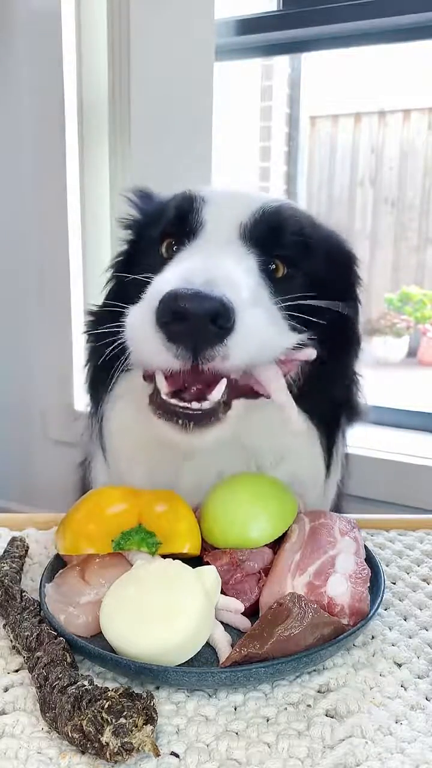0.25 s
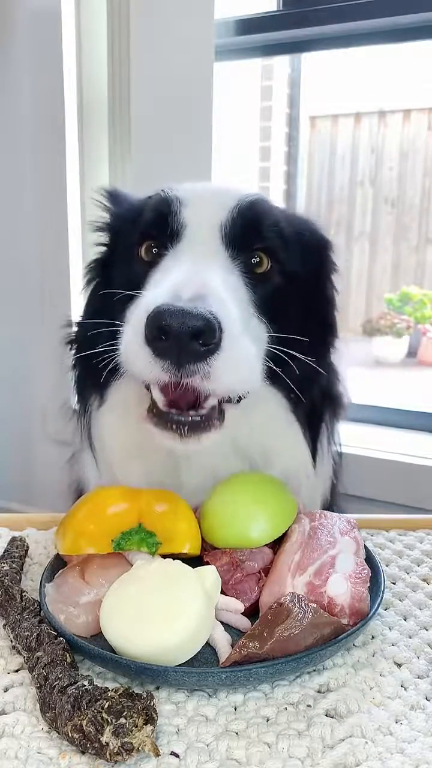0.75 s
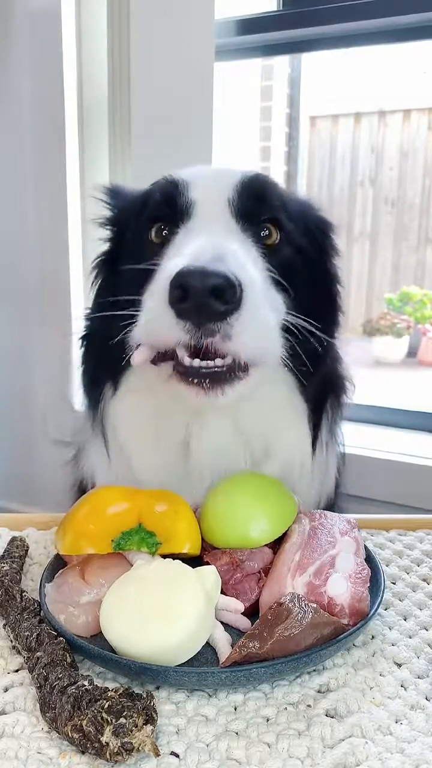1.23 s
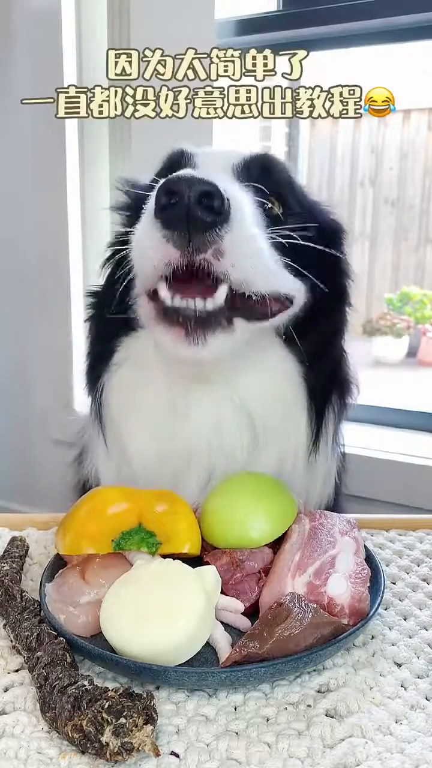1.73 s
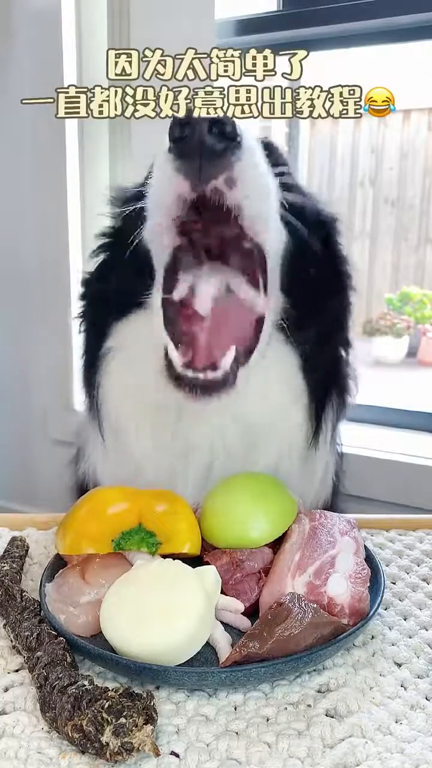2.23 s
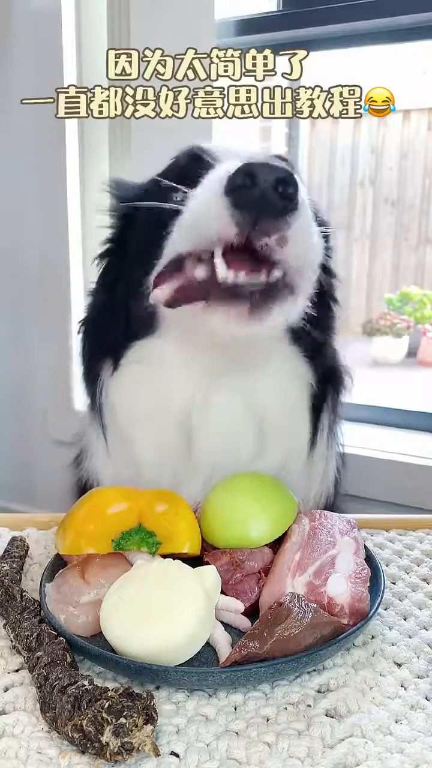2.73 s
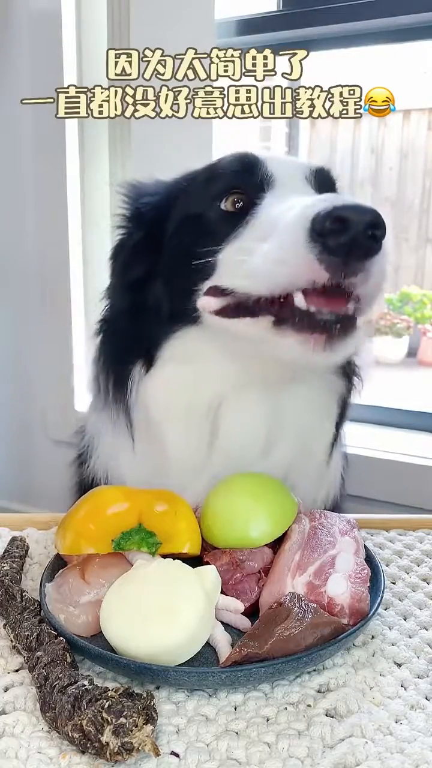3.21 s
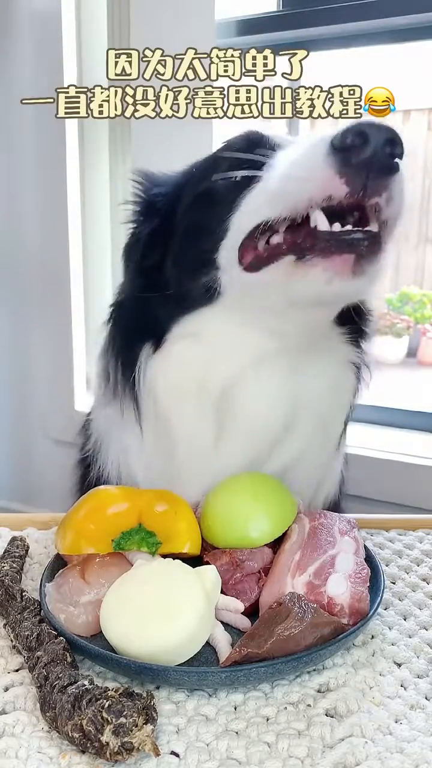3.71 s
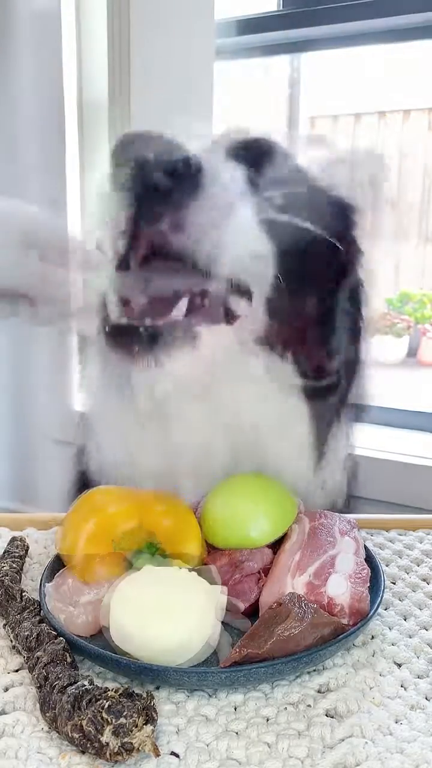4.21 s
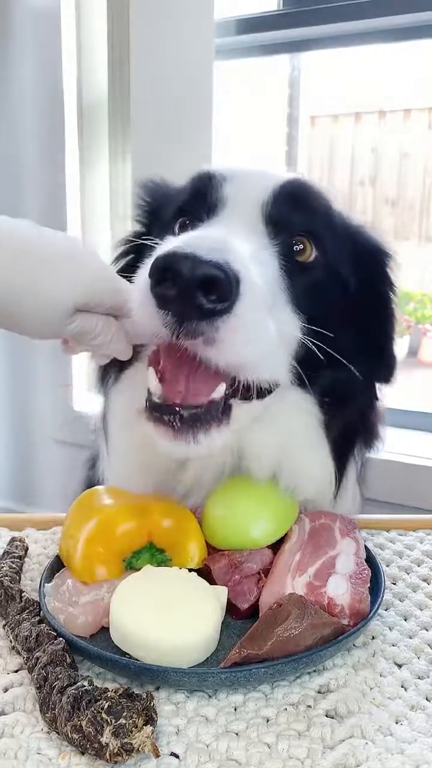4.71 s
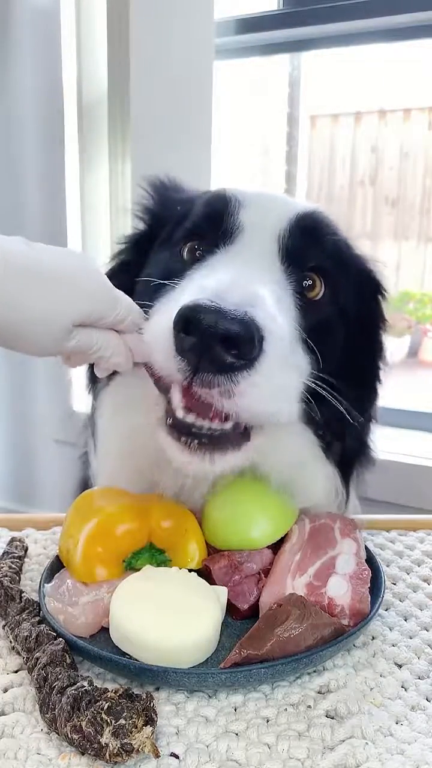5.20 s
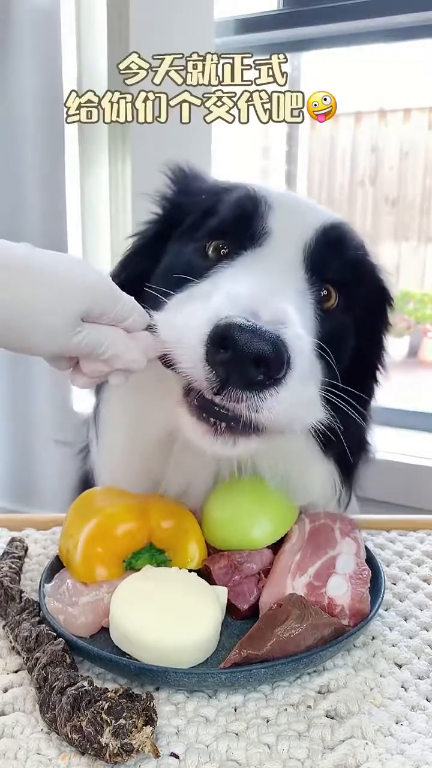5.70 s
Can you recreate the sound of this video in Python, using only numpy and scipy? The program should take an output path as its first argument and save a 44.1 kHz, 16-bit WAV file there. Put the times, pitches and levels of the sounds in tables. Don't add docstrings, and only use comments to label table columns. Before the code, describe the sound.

Extreme close-up of a dog's mouth indoors: bright bone snaps, hollow gristle pops, tiny fibre clicks and sticky smacks. A flurry of cracks comes first, then a quieter gap, then uneven chewing with short airy draughts and thin spit squeaks. Deep jaw puffs push the microphone, stronger later on. The sound is dry, with loud peaks tightly held down.

```python
import sys
import numpy as np
from scipy import signal
from scipy.fft import rfft, irfft, next_fast_len
from scipy.io import wavfile
from scipy.ndimage import uniform_filter1d, minimum_filter1d, map_coordinates

SR = 44100
rng = np.random.default_rng(int(sys.argv[2]) if len(sys.argv) > 2 else 0)


def voltage_ratio(decibels):
    exponent = np.asarray(decibels, float) / 20
    return 10 ** exponent


def wav_out(sig):
    wavfile.write(sys.argv[1], SR, np.round(np.clip(np.atleast_2d(sig).T, -1, 1) * 32767).astype(np.int16))


N = 262395


def unit(x):
    return x / np.sqrt(np.mean(x ** 2) + 1e-20)


def along(points, hz):
    f, v = np.transpose(points)
    return np.interp(np.log(hz + 1), np.log(f + 1), v)


def wobble(rate):
    knots = rng.standard_normal(int(N * rate / SR) + 4)
    return map_coordinates(knots, [np.arange(N) * rate / SR])


def coloured(x, spectrum):
    m = next_fast_len(N + 8192)
    gain = voltage_ratio(along(spectrum, np.fft.rfftfreq(m, 1 / SR)))
    return irfft(rfft(x, m) * gain, m)[:N]


def placed(start_s, shapes):
    at = np.round(start_s * SR).astype(int)[:, None] + np.arange(shapes.shape[1])
    return np.bincount(np.clip(at, 0, N).ravel(), shapes.ravel(), N + 1)[:N]


def flat_bump(s, length_s):
    return np.exp(-(2 * (np.arange(N) / SR - s) / length_s) ** 4)


def swells(s, peak_db, rise_s, fall_s, rest_db):
    step = 32
    late = np.arange(0, N, step) / SR - s[:, None]
    slope = np.where(late < 0, late / np.abs(rise_s)[..., None], -late / np.abs(fall_s)[..., None])
    power = voltage_ratio(2 * (peak_db[:, None] + 20 * slope)).sum(axis=0) + voltage_ratio(2 * rest_db)
    return np.repeat(np.sqrt(power), step)[:N]


def wet_layer(spectrum, rate, spread_db, life_s, grain_share):
    size_db = np.minimum(spread_db * rng.exponential(size=N), 9)
    pops = (rng.random(N) < rate / SR) * voltage_ratio(size_db)
    t = np.arange(SR // 100) / SR
    bursts = signal.fftconvolve(pops, np.exp(-t / life_s))[:N]
    flutter = voltage_ratio(2 * wobble(40))
    grain = 1 + grain_share * unit(bursts)
    return unit(coloured(grain * flutter * rng.standard_normal(N), spectrum))


def blips(count, centre_hz, spread, cycles):
    when, size = rng.random((2, count, 1))
    hz = centre_hz * np.exp(spread * rng.standard_normal((count, 1)))
    turns = hz * np.arange(round(6 * SR / 250)) / SR
    ring = -np.sin(2 * np.pi * turns) * turns * np.exp(-3 * turns / cycles)
    return unit(placed(when[:, 0] * N / SR, ring * (.25 + size) ** -.4))


def cavities(x):
    z = signal.stft(x, nperseg=512)[2]
    field = uniform_filter1d(rng.standard_normal(z.shape), size=3, axis=0)
    field = uniform_filter1d(field, size=24, axis=1)
    gain = unit(voltage_ratio(2.2 * unit(field)))
    return signal.istft(z * gain, nperseg=512)[1][:N]


# [s, s].
WET_DIPS = [
    (0.137, 0.03),
    (1.087, 0.049),
    (2.483, 0.052),
    (3.48, 0.13),
    (3.695, 0.024),
    (4.036, 0.086),
    (5.462, 0.011),
]


def wet_dips():
    s, length_s = np.transpose(WET_DIPS)[:, :, None]
    return flat_bump(s, length_s).max(axis=0)


# [Hz, dB].
SMACK_SPECTRUM = [(200, 2.5), (260, 9.5), (350, 1.5), (700, -0.5), (1400, 4), (2500, -3.5), (4000, -19),
                  (8000, -63)]
FIZZ_SPECTRUM = [(800, -62), (2000, -4), (3500, -0.5), (5000, -3.5), (7000, -8.5), (11000, -27.5)]
HISS_SPECTRUM = [(3000, -30), (6000, 1), (8000, 1.5), (9500, -4.5), (11000, -22), (14000, -32)]
SPRAY_SPECTRUM = [(8000, -28), (10500, 3), (13000, 1), (15700, -7), (16300, -35)]
# [s, dB, dB, dB, s].
SQUEEZES = [(0, -34.5, -3.5, -12, 2.7), (.17, -48.5, 7.5, -6, 1.5), (.42, -35, 9.5, -9.5, 0.24),
            (.64, -31.5, -31, -15.5, 0.5), (.88, -31.5, -22, -14, 0.2), (1.052, -36.5, 11, -14, 0.34),
            (1.187, -20, -4, -15, 0.2), (1.412, -29.5, -8, -6, 0.24), (1.51, -34, -9, 1.5, 1.64),
            (2.03, -25, -4, 0.5, 0.26), (2.1, -32, 0.5, -6.5, 1.5), (2.378, -40.5, -25, 2, 1.5),
            (2.54, -55, -7, 0, 23), (2.8, -42, 0.5, -9, 10), (3.102, -33, 1, 0, 1),
            (3.33, -32.5, -1, -7, 0.35), (3.556, -21, -15, 2.5, 0), (3.599, -47.5, 10, 1, -0.55),
            (3.77, -31, -8, -2.5, 1.1), (4.08, -33, -8.5, 3.5, 1.5), (4.3, -38, -11.5, 16, 0.4),
            (4.47, -28.5, -2.5, 1.5, 0.73), (4.849, -36, -1.5, 0, 1.5), (5.12, -33.5, 4, -7, 0.3),
            (5.28, -35, -18, -4, -1), (5.552, -33.5, 5.5, -6, 0.52), (5.7, -42.5, 2, 1.5, 0.7)]


def flesh():
    s, smack_db, fizz_db, hiss_db, drain_s = np.transpose(SQUEEZES)
    wring_s = 0.052
    low = swells(s, smack_db, wring_s, 0.88 * drain_s, rest_db=-57)
    mid = swells(s, smack_db + fizz_db, wring_s, drain_s, rest_db=-68)
    high = swells(s, smack_db + fizz_db + hiss_db, wring_s, 0.5 * drain_s, rest_db=-54)

    smack = wet_layer(SMACK_SPECTRUM, rate=120, spread_db=4, life_s=.0015, grain_share=.3)
    squelch = 0.4 * blips(count=900, centre_hz=1400, spread=0.49, cycles=1.8)
    fizz = wet_layer(FIZZ_SPECTRUM, rate=150, spread_db=4, life_s=.0007, grain_share=.35)
    sizzle = 0.66 * blips(count=900, centre_hz=2850, spread=0.43, cycles=2.4)
    hiss = wet_layer(HISS_SPECTRUM, rate=150, spread_db=4, life_s=.0007, grain_share=.4)
    spray = wet_layer(SPRAY_SPECTRUM, rate=150, spread_db=4, life_s=.0007, grain_share=.5)

    muffle_db = (-5.5, -15.5, -13.5)
    low, mid, high = [low, mid, high] * voltage_ratio(np.outer(muffle_db, wet_dips()))
    pockets = cavities(low * (smack + squelch) + mid * (fizz + sizzle))
    return pockets + high * hiss + voltage_ratio(14) * high ** 1.634 * spray


# [s, dB, Hz].
FIBRES_FIRST = [(0.0114, -13, 3050), (0.0667, -8, 2640), (0.0785, -24, 2400), (0.1605, -16, 4720),
                (0.2244, -18, 4630), (0.2437, -15, 2960), (0.3321, -7.5, 3900), (0.7359, -14, 3700),
                (0.9864, -12, 4000), (1.1387, -10, 4900), (1.167, -13, 3920), (1.1974, -10, 3080),
                (1.3014, -28, 3800), (1.4234, -12, 2530), (1.4885, -12.5, 6600), (1.5244, -14, 3180),
                (1.5723, -16, 5400), (1.612, -14, 2480), (1.734, -17, 7600), (1.8416, -21, 2950),
                (1.9138, -16, 7500), (2.005, 3, 2110), (2.0901, -6, 2580), (2.3137, -14, 4100),
                (2.3486, -13, 4430), (2.382, -19, 2750), (2.4247, -7.5, 3400), (2.533, -20, 4200),
                (2.55, -14, 4700), (2.6517, -20, 6200), (2.717, -15, 3330), (2.8936, -22, 2700),
                (2.9537, -16, 4040), (2.9747, -22, 6040), (2.9801, -14, 8200), (3.002, -15, 2560),
                (3.016, -13, 4290), (3.0264, -15, 2630), (3.0616, -5, 7500)]
FIBRES_LATE = [(3.1745, -6.5, 3580), (3.1927, -12, 7400), (3.247, -10, 2630), (3.311, -9.5, 3230),
               (3.327, -8, 3170), (3.3386, -22, 2580), (3.3435, -13, 2680), (3.4743, -23, 5800),
               (3.5448, -18, 2460), (3.582, -15, 3200), (3.5967, -13.5, 3050), (3.6114, -18, 5060),
               (3.7252, -15, 4960), (3.759, -12, 2540), (3.8445, -14, 6000), (4.0354, -20, 3260),
               (4.0978, -4.5, 2650), (4.126, -21, 8630), (4.1717, -17, 5600), (4.2213, -15, 6560),
               (4.2716, -16, 7100), (4.3295, -12, 1800), (4.4584, -7.5, 3020), (4.8238, -12.5, 4650),
               (4.9128, -11, 3950), (4.9675, -12, 6040), (4.9916, -8.5, 2840), (5.0485, -18, 2660),
               (5.098, -10, 4700), (5.1032, -16, 3980), (5.1583, -15, 5340), (5.253, -16, 2840),
               (5.4505, -15, 2830), (5.546, -7.5, 4830), (5.5487, -10, 6500), (5.5528, -9, 4300),
               (5.5654, -14, 6350), (5.5764, -3, 4180), (5.581, -3, 4230), (5.6559, -14, 2800)]
LAG_S = .001


def fibres():
    rows = list(FIBRES_FIRST) + list(FIBRES_LATE)
    return [(s + LAG_S, db + 0.19, hz, -5, -32) for s, db, hz in rows]


# [s, dB, Hz].
TICKS_FIRST = [(0.031, -10.5, 1880), (0.053, -8.5, 1910), (0.071, -16, 2620), (0.204, -8.5, 1480),
               (0.327, -9, 2420), (0.347, -2, 1980), (0.373, -8.5, 2480), (0.38, -6, 2330),
               (0.385, -1, 2480), (0.678, -10, 1470), (0.7315, -9, 2410), (0.951, -10, 1270),
               (1.034, -12.5, 4730), (1.191, -13, 3260), (1.251, -18, 880), (1.397, -3, 5280),
               (1.564, -7.5, 1800), (1.798, -12.5, 980), (1.932, -8, 1660), (2.009, 3, 2260)]
TICKS_TURNED = [(2.325, -3.5, 1550), (2.372, -6.5, 4440), (2.725, -11.5, 940), (2.994, -9, 1560),
                (3.009, -7, 1400), (3.098, -26, 3530), (3.134, -2, 2470), (3.161, -4, 2930),
                (3.188, -9.5, 6550), (3.541, -6, 720), (3.6824, -14, 4660), (3.777, -10, 1720),
                (3.891, -11, 1170)]
TICKS_HELD = [(4.0775, -15.5, 4430), (4.206, -5.5, 1870), (4.244, -10, 1600), (4.264, -10.5, 6830),
              (4.229, -10, 1400), (4.286, -4, 1330), (4.301, -6.5, 1110), (4.335, -3, 1850),
              (4.438, -5, 1900), (4.509, -8.5, 2750), (4.728, -10.5, 1250), (4.899, -11, 1040),
              (4.97, -11, 1340), (5.009, -9.5, 1400), (5.069, -7, 3700), (5.084, -7.5, 4600),
              (5.105, -11.5, 940), (5.110, -2, 4120), (5.125, 2, 4070), (5.15, -6, 2540),
              (5.2227, -13, 3970), (5.557, -3.5, 4100), (5.5893, -7, 1700), (5.634, -6.5, 2750)]


def ticks():
    rows = list(TICKS_FIRST) + list(TICKS_TURNED) + list(TICKS_HELD)
    return [(s, db, hz, -8.5 + 7 * np.log2(hz / 2000), -12) for s, db, hz in rows]


# [s, dB, Hz].
POPS = [(0.087, -1, 1900), (0.095, -4, 1310), (.12, -2, 1440), (.295, -5.5, 3680), (1.416, 6, 1310),
        (1.512, -3, 1610), (1.658, -6.5, 1350), (1.731, -3.5, 1390), (1.982, -5, 1310), (2.405, 0, 1150),
        (2.4666, -5.5, 2060), (2.615, -9.5, 3280), (2.677, -3, 840), (2.919, -8, 1280), (3.125, -2.5, 2530),
        (3.316, -5, 2050), (5.795, -5, 2800)]
DULL_SPLINTER_DB = -48


def pops():
    return [(*row, DULL_SPLINTER_DB, -41) for row in POPS]


# [s, dB, Hz].
SMACKS = [(0.088, -3, 1480), (0.17, -7, 1910), (0.364, 1, 2800), (0.395, -6, 1970), (0.656, -12, 576),
          (0.672, -14, 1430), (0.869, -18, 2050), (0.886, -8, 1140), (0.965, -21, 1500), (0.976, -13, 1460),
          (1.023, -19, 1600), (1.074, -9, 2140), (1.196, -19, 2340), (1.237, -14, 810), (1.252, -6, 970),
          (1.34, -9.5, 1940), (1.489, -12, 1480), (1.5217, -10, 1530), (1.5485, -15, 1400),
          (1.61, -4.5, 1410), (1.629, -12, 680), (1.6645, -19, 1360), (1.7248, -12, 1290), (1.84, -14, 585),
          (1.852, -12, 1140), (1.9895, -12, 2140), (1.998, -7, 1670), (2.312, -12.5, 770), (2.38, -3, 1380),
          (2.39, -13, 1230), (2.689, -15, 1400), (2.742, -10, 1420), (2.979, -19.5, 1400),
          (3.015, -12.5, 594), (3.044, -15, 1330), (3.265, -20, 1920), (3.31, -13, 1990),
          (3.413, -13.5, 1120), (3.519, -14, 740), (3.82, -11, 786), (3.842, -15, 1220), (3.863, -18, 1220),
          (3.877, -13, 730), (3.946, -8, 820), (3.98, -9, 665), (4.02, -13.5, 636), (4.532, -10, 1370),
          (4.635, -16, 2000), (4.779, -15, 1950), (5.056, -12, 1620), (5.117, -7, 970), (5.302, -18, 1410),
          (5.432, -16.5, 895), (5.578, -10.5, 1680), (5.846, -14.5, 1910)]


def smacks():
    return [(s + LAG_S, db + 0.38, hz, -35, -21) for s, db, hz in SMACKS]


# [s, dB, Hz, dB].
SNAPS = [(.176, -6, 2620, -11), (0.271, -5.5, 3220, -5), (0.31, -3, 6260, -3.5), (0.355, 4, 3080, 1),
         (.393, 3, 4400, -3), (0.8058, -2.5, 1950, -6), (0.996, -13.5, 1170, 3.5), (1.085, -4.5, 2200, -2),
         (1.125, -3, 3620, -1), (1.404, 4.5, 2800, 0), (1.5965, 1.5, 1690, -1.5), (1.862, -6, 5650, -8),
         (2.029, 8.5, 2820, 5), (2.286, 1, 6770, -26), (2.539, -3, 5370, -4.5), (3.085, -2, 2760, -1),
         (3.323, -5, 1420, -8), (3.748, 4.5, 2700, 11.5), (4.184, -3, 5800, -1), (4.256, -5, 2250, -16),
         (4.375, -12, 1790, 5.5), (4.446, 3.5, 990, 2.5), (4.48, -3, 1840, -3), (5.041, -6.5, 4240, 10),
         (5.481, -6.5, 4100, -2.5), (5.669, -13, 4100, 13), (5.717, -13.5, 1190, 8), (5.74, -2, 1510, -2)]


def snaps():
    return [(*row, -29) for row in SNAPS]


# [s, dB, Hz, dB, dB].
CRUSHES = [(0.232, -3.5, 2050, -9, -6), (1.053, -2.5, 3920, -6.5, -4.5), (1.134, -3, 1140, 4.5, -0.5),
           (1.501, -21, 2330, 19, 2), (1.638, -3.5, 1510, -8, -12), (1.939, -6.5, 760, -6, -13),
           (2.045, 2, 2780, -4, -6), (2.444, 0.5, 1400, -12, -11), (2.75, -15.5, 735, 11, 7),
           (3.067, -2, 1380, 1.5, -10.5), (3.143, 8.5, 2570, 4, -3), (3.715, -8.5, 1290, 3.5, -0.5),
           (3.721, -17, 2640, 12.5, 0), (3.767, 3.5, 2580, 10, -1), (3.8118, 0, 2000, -4.5, -8),
           (3.855, -6, 1020, -17, -10), (4.099, -0.5, 677, -17, -9.5), (4.402, -4, 910, 4, 3),
           (4.472, -1.5, 2010, 0, -15), (4.539, -5, 1920, 0.5, -6.5), (5.176, -9, 3920, 3.5, -2.5),
           (5.604, -0.5, 3870, 3, -11), (5.662, -7.5, 1850, 6.5, -2)]


def crushes():
    return [tuple(row) for row in CRUSHES]


# [s, dB, Hz].
KNOCKS = [(0.563, -1, 1113), (.74, -6.5, 530), (0.891, -7.5, 1010), (1.351, -11, 500), (1.819, -9, 3500),
          (2.256, -7.5, 1280), (2.671, -10, 776), (3.953, -2, 823), (4.311, -0.5, 1630),
          (4.944, -4.5, 1310), (5.473, -9.5, 960)]


def knocks():
    return [(s, db, hz, DULL_SPLINTER_DB, -18 - db) for s, db, hz in KNOCKS]


# [Hz, dB].
SPLINTER_SPECTRUM = [(2500, -1.5), (5000, -9), (8000, -8), (10000, -17.5), (15700, -24), (16500, -39)]


def cracks():
    breaks = np.array(fibres() + ticks() + pops() + smacks() + snaps() + crushes() + knocks())
    s, peak_db, ring_hz, splinter_db, thud_db = breaks.T[:, :, None]
    lead = np.arange(-SR // 100, SR // 25) / SR
    t = np.maximum(lead, 0)
    luck = rng.standard_normal((len(breaks), 6))
    noise = rng.standard_normal((len(breaks), 3, len(t)))

    swell_in = .22 * voltage_ratio(60 * np.minimum(lead, 0) / .008) * (lead < 0)
    u = t * np.minimum(ring_hz, 3500) * 5.2
    pull = -1.2 * u * (2 - 0.75 * u) * np.exp(-u)

    ring_s = (0.0016 + 7.4 / ring_hz) * np.exp(0.27 * luck[:, :1])
    drift = 0.07 * np.sqrt(ring_hz / 1000) * np.cumsum(noise[:, 2], axis=1)
    soft = 1 - np.exp(-4 * ring_hz * t)
    swing = np.sin(2 * np.pi * ring_hz * t + drift * (lead >= 0))
    ring = -soft * voltage_ratio(-40 * (t / ring_s) ** 0.9) * swing
    second_hz = np.minimum(ring_hz * 2.153 * np.exp(0.31 * luck[:, 1:2]), 9000)
    second = 0.31 * soft * voltage_ratio(-60 * t / ring_s) * np.sin(2 * np.pi * second_hz * t)

    slow = uniform_filter1d(noise[:, 0], size=10, axis=1)
    slow = uniform_filter1d(slow, size=10, axis=1)
    ring_noise = 3 * slow * np.cos(2.4 * np.pi * ring_hz * lead)
    grit = (2 * swell_in + .55 * voltage_ratio(-60 * t / .007) * soft) * ring_noise
    body = voltage_ratio(peak_db + 0.25) * (pull + ring + second + grit)

    shower = .4 * swell_in + voltage_ratio(-40 * (t / .006) ** .7) * (lead >= 0)
    splinters = voltage_ratio(peak_db + splinter_db + 8.0) * noise[:, 1] * shower
    jaw_hz = 259 * np.exp(0.094 * luck[:, 2:3])
    jaw_t60_s = 0.03
    thud = -voltage_ratio(peak_db + thud_db + 2.0 - 60 * t / jaw_t60_s) * np.sin(2 * np.pi * jaw_hz * t)
    onset = s[:, 0] + lead[0] - .0005
    return placed(onset, body + thud) + coloured(placed(onset, splinters), SPLINTER_SPECTRUM)


# [Hz, s].
ROOM_T60 = [(200, 0.039), (2000, 0.056), (10000, 0.02)]


def room(x):
    hz, t, z = signal.stft(rng.standard_normal(SR // 2), SR, nperseg=256)
    decay = voltage_ratio(-60 * t / along(ROOM_T60, hz)[:, None])
    tail = signal.istft(z * decay, SR, nperseg=256)[1]
    return signal.fftconvolve(np.pad(x, (60, 0)), tail / np.linalg.norm(tail))[:N]


def puffs(s, thump_db):
    luck = rng.standard_normal((len(s), 2))
    puff_hz = 92.7 * np.exp(.25 * luck[:, :1])
    turns = puff_hz * np.arange(-SR // 25, SR // 25) / SR
    swing = np.cos(2 * np.pi * turns + 2 * luck[:, 1:]) * np.exp(-2 * turns ** 2)
    return placed(s - 1 / 25, voltage_ratio(thump_db + 6)[:, None] * swing)


# [Hz, dB].
HEAVE_SPECTRUM = [(8, -72), (18, 2.5), (35, -1), (60, -6), (110, -27), (300, -69)]
RUMBLE_SPECTRUM = [(30, -54), (70, -4), (130, -3), (260, -8.5), (500, -14), (1500, -60)]
# [s, dB].
STROKES = [(.09, -21.5), (.19, -20), (.55, -27.5), (.68, -20), (.9, -33), (1, -18), (1.55, -20),
           (1.87, -24.5), (1.98, -17), (2.26, -23.5), (2.389, -19), (2.65, -25), (2.74, -19.5),
           (2.951, -19), (3.04, -16), (3.42, -13), (3.61, -12.5), (3.7, -15), (3.84, -19.5), (3.94, -37),
           (4.103, -13), (4.23, -12.5), (4.32, -17.5), (4.831, -17.5), (4.899, -8.5), (5.419, -13)]
# [s, dB].
THUMPS = [(0.175, -26), (0.237, -21.5), (0.557, -25.5), (0.678, -18), (0.889, -21), (1.038, -15.5),
          (1.138, -26.5), (1.52, -17), (1.844, -19), (1.95, -16), (2.379, -17), (2.65, -28), (2.73, -12.5),
          (3.01, -13), (3.152, -24), (3.421, -22.5), (3.549, -24.5), (3.678, -18.0), (3.892, -14.5),
          (3.952, -21.5), (4.249, -15.5), (4.31, -17), (4.402, -24.5), (4.918, -15.5), (4.992, -16.5),
          (5.434, -13.5), (5.589, -20.5), (5.849, -28)]


def pushes():
    s, heave_db = np.transpose(STROKES)
    puff_s, thump_db = np.transpose(THUMPS)
    slow = swells(s, heave_db, rise_s=0.094, fall_s=0.066, rest_db=-37)
    quick = swells(puff_s, thump_db, rise_s=0.062, fall_s=0.039, rest_db=-43.5)
    swing = signal.hilbert(coloured(rng.standard_normal(N), HEAVE_SPECTRUM), next_fast_len(N))[:N]
    even = swing.real / np.abs(swing) ** 0.5
    heave = unit(coloured(even, [(100, -18), (300, -14.5)]))
    flutter = voltage_ratio(2 * wobble(25)) * rng.standard_normal(N)
    rumble = unit(coloured(flutter, RUMBLE_SPECTRUM))
    lumps = unit(voltage_ratio(1.5 * wobble(20)))
    return lumps * (voltage_ratio(5.0) * slow * heave + voltage_ratio(-3) * quick * rumble) + puffs(puff_s, thump_db)


# [s, dB, Hz, s].
DRAUGHTS = [
    (0.465, -31, 2336, 0.23),
    (0.855, -34.5, 1923, 0.053),
    (1.606, -33, 1450, 0.18),
    (2.128, -28.5, 2524, 0.23),
    (3.255, -30, 2440, 0.19),
    (3.553, -24, 2177, 0.033),
    (4.6, -33.5, 2003, 0.16),
    (4.868, -30, 1400, .07),
]


def draughts():
    s, level_db, hz, length_s = np.transpose(DRAUGHTS)[:, :, None]
    t = np.arange(N) / SR
    width_hz = 790
    lowpass = signal.butter(2, width_hz / SR, output="sos")
    blur = signal.sosfilt(lowpass, rng.standard_normal((2, N)))
    band = unit(blur[0]) * np.sin(2 * np.pi * hz * t) + unit(blur[1]) * np.cos(2 * np.pi * hz * t)
    return np.sum(voltage_ratio(level_db) * band * flat_bump(s, length_s), axis=0)


# [s, dB, Hz, s, oct/s].
SQUEAKS = [
    (1.636, -29, 1400, 0.32, 2),
    (2.526, -31.5, 1487, 0.11, 1.5),
    (2.594, -28, 1425, 0.053, 3),
    (2.719, -29, 1446, 0.061, -2),
    (4.81, -23.5, 1000, 0.029, 1),
    (4.822, -25, 1520, 0.03, .5),
    (5.334, -35, 1430, 0.088, 3.5),
    (5.363, -35.5, 1530, 0.043, 1),
    (5.387, -32, 990, 0.057, 1),
]


def squeaks():
    s, level_db, hz, length_s, glide = np.transpose(SQUEAKS)[:, :, None]
    t = np.arange(N) / SR
    waver = np.cumsum(.035 * wobble(70)) / SR
    phase = 2 * np.pi * hz * (t + waver + np.log(2) * glide * (t - s) ** 2 / 2)
    rough = .45 + .85 * wobble(220)
    return rough * np.sum(voltage_ratio(level_db) * np.sin(phase) * flat_bump(s, length_s), axis=0)


def scene():
    bites = cracks()
    mouth = bites + flesh() + squeaks() + draughts()
    return (mouth + voltage_ratio(-11.5) * room(bites) + pushes())[None]


def top_cut(x):
    return signal.sosfilt(signal.butter(12, 16680, fs=SR, output="sos"), x)


def record(dry):
    needed = np.minimum(1, .96 / (np.abs(dry) + 1e-9))
    gain = uniform_filter1d(minimum_filter1d(needed, size=200), size=200)
    held = coloured(dry[0] * gain[0], [(15500, 0), (16050, -26), (16700, -45)])
    return top_cut(held[None])


dry = scene()
out = record(dry)
wav_out(out)
```